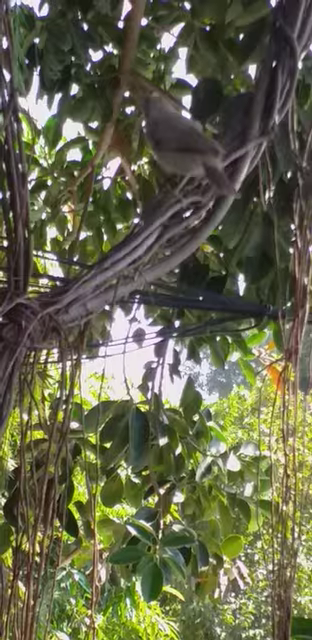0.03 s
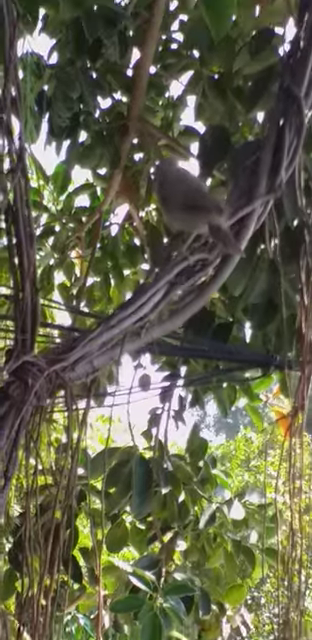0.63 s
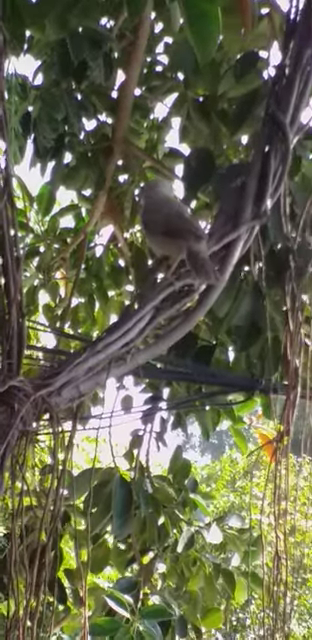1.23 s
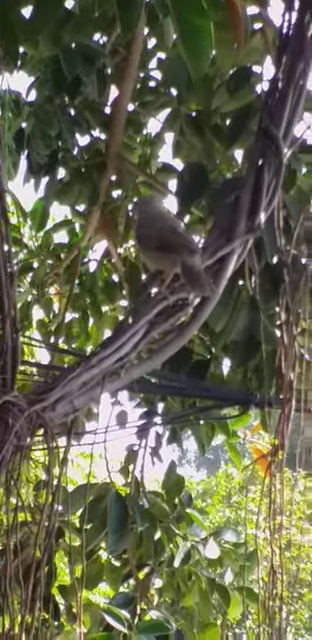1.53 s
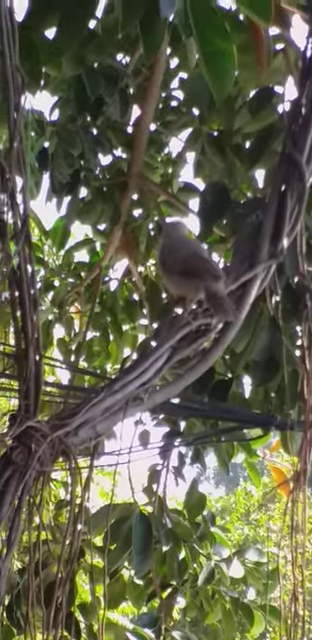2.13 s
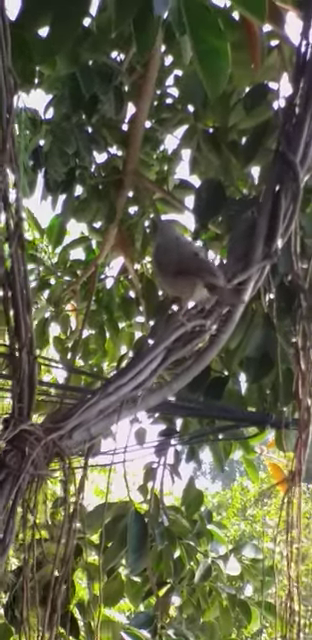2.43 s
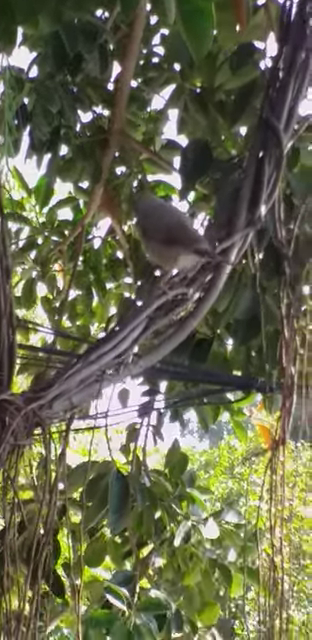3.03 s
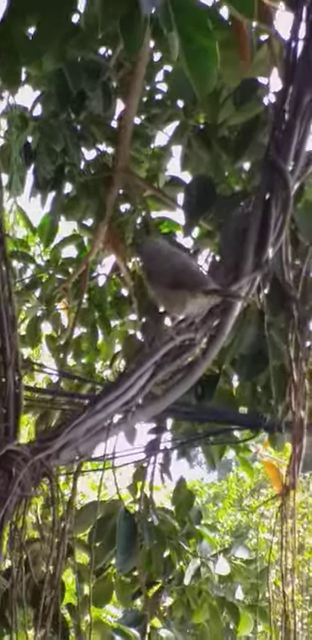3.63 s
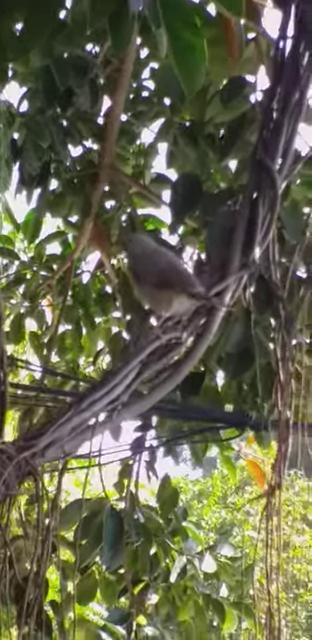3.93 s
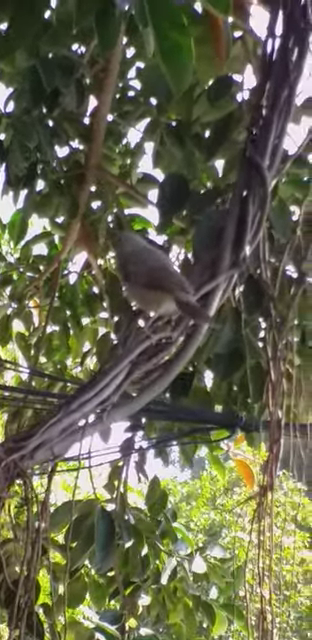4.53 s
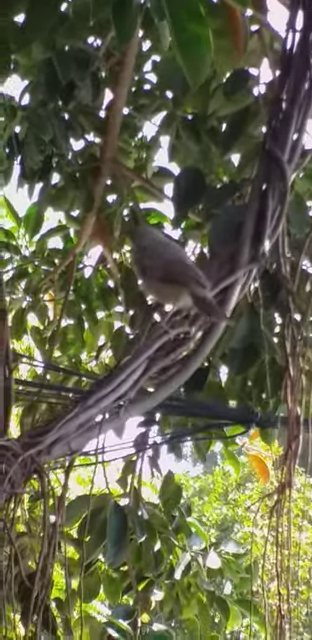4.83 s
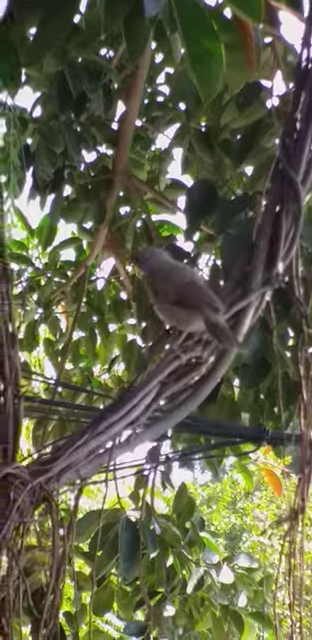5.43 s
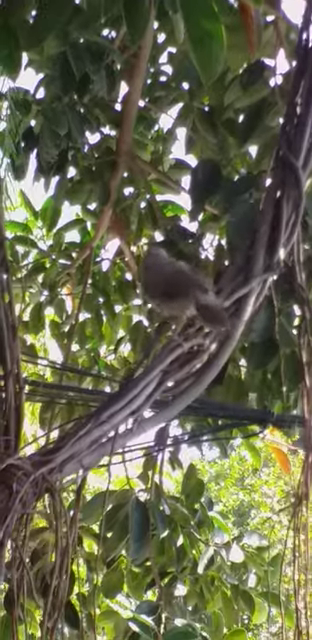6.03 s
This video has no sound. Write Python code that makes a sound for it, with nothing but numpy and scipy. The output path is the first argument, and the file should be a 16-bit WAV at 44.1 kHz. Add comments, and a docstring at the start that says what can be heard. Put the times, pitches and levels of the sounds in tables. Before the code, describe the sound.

Several birds call in a leafy tree, trading short harsh rasps, hoarse wheezy whistles and quick high chips. A closer nasal squawk comes about two seconds in, followed by a busy run of rasps and screeches. From halfway, a vehicle pulls away with a growing low rumble while the birds keep calling. The calls echo lightly through the foliage, over faint distant traffic and leaf noise, heard in mono.

```python
"""A party of babblers calls in a leafy tree: harsh rasps, wheezy whistles, chips and one nasal squawk.
Each call follows the source-filter principle: the syrinx snaps or oscillates, and throat or beak colours
the sound. Trunks and foliage scatter it into echoes and a diffuse tail. Behind the birds lies the noise
of far traffic and leaves, and one vehicle pulls away, growing louder with load and speed.
Both channels carry the same signal."""
import sys
import numpy as np
from scipy import signal
from scipy.fft import rfft, irfft, next_fast_len
from scipy.io import wavfile
from scipy.ndimage import map_coordinates

SR = 44100
rng = np.random.default_rng(int(sys.argv[2]) if len(sys.argv) > 2 else 0)


def wrap_up_sound(samples):
    """Save the sound to the file named by the first command line argument, as 16-bit audio."""
    columns = np.atleast_2d(samples).T
    # keep every value between -1 and 1, then stretch to whole-number steps
    tamed = np.clip(columns, -1, 1)
    steps = np.round(tamed * 32767).astype(np.int16)
    wavfile.write(sys.argv[1], SR, steps)


N = 276507
TOP_HZ = 15700  # band limit


def amp(db):
    """Decibels as an amplitude ratio."""
    return 10 ** (np.asarray(db) / 20)


def unit(x):
    """Normalisation to rms 1."""
    return x / np.sqrt(np.mean(x ** 2) + 1e-20)


def along(points, hz):
    """Interpolation of (frequency_hz, value) points on a logarithmic frequency axis."""
    knots_hz, values = np.transpose(points)
    return np.interp(np.log(hz + 1), np.log(knots_hz + 1), values)


def span(start, end):
    """Sample times from start to end, in seconds."""
    return np.arange(int(start * SR), min(int(end * SR), N)) / SR


def add(track, t, x):
    """Superposition of x on the track at the times t."""
    track[round(t[0] * SR):][:len(x)] += x


def wobble(knots_per_s, size):
    """Random modulation: a smooth curve through Gaussian knots."""
    knots = rng.standard_normal(int(size * knots_per_s / SR) + 4)
    return map_coordinates(knots, [np.arange(size) * knots_per_s / SR])


def coloured(x, points):
    """Linear filtering by a (frequency_hz, gain_db) response."""
    size = next_fast_len(len(x) + 8192)
    return irfft(rfft(x, size) * amp(along(points, np.fft.rfftfreq(size, 1 / SR))), size)[:len(x)]


def noise(points):
    """Spectral shaping of white noise, at rms 1."""
    return unit(coloured(rng.standard_normal(N), points))


# spectrum of far traffic and leaves: frequency_hz, density_db
AMBIENT_SPECTRUM = [(25, -35.5), (42, -14), (56, -3), (100, 2.5), (165, -7.5), (280, -10), (500, -15.5),
                    (650, -9.5), (850, -16.5), (2000, -12), (5000, -23), (9000, -29), (15000, -20)]


def ambience():
    """Incoherent sources, far traffic and leaves, sum to a gently wavering noise."""
    return amp(-49.5 + 1.296 * wobble(4.163, N)) * noise(AMBIENT_SPECTRUM)


ARRIVES_S, PULLS_AWAY_S, EASES_OFF_S = 2.77, 3.556, 5.9604  # fade-in ends; half throttle; fade-out starts
IDLE_HZ, REV_HZ_PER_S, THROTTLE_OPENING_S = 13.8, 12, 0.4953
FADE_IN_DB_PER_S, FADE_OUT_DB_PER_S = 69.5, 29


def drive():
    """Acceleration: the engine's cycle rate integrates the throttle (0-1) until the vehicle eases off."""
    t = np.arange(N) / SR
    throttle = np.clip((t - PULLS_AWAY_S) / THROTTLE_OPENING_S + .5, 0, 1)
    cycle_hz = IDLE_HZ + REV_HZ_PER_S * np.cumsum(throttle * (t < EASES_OFF_S)) / SR
    fade_db = -FADE_IN_DB_PER_S * np.maximum(ARRIVES_S - t, 0)
    fade_db -= FADE_OUT_DB_PER_S * np.maximum(t - EASES_OFF_S, 0)
    return throttle, cycle_hz, fade_db


# tones of the vehicle's whine at top speed: frequency_hz, level_db
WHINE_TONES = [(680, -4), (770, -5.5), (820, 0), (980, -2), (1120, -14.5)]


def whine(climb_per_s=.035, waver=0.00696):
    """Frequency follows speed: a few wavering tones creep up in pitch."""
    speed = 1 - climb_per_s * np.maximum(EASES_OFF_S - np.arange(N) / SR, 0)
    tones = np.zeros(N)
    for hz, db in WHINE_TONES:
        gain = amp(db + 2 * wobble(10, N))
        phase = 2 * np.pi * hz * np.cumsum(speed * (1 + waver * wobble(30, N))) / SR
        tones += gain * np.sin(phase)
    return unit(tones)


# spectra of the vehicle's low rumble and broad roar: frequency_hz, density_db
RUMBLE_SPECTRUM = [(25, -41.5), (42, -35.5), (58, -1.5), (90, -14.5), (120, 8), (175, -11.5), (280, -8.5),
                   (360, -8.5), (450, -31.5), (900, -26.5)]
ROAR_SPECTRUM = [(40, -53.5), (350, -5), (520, -3.5), (680, 2), (810, 3.5), (1000, -1), (1300, -0.5),
                 (1850, 0), (2500, -7), (4000, -11.5), (7000, -19), (15000, -75.5)]


def vehicle_noise(load_db=22.5, db_per_octave=20.5):
    """Rumble grows with engine load; roar and whine grow as a power law of engine speed."""
    throttle, cycle_hz, fade_db = drive()
    rumble_db = -69.5 + load_db * throttle
    roar_db = -66.5 + db_per_octave * np.log2(cycle_hz / IDLE_HZ) + fade_db
    rumble = amp(rumble_db + 3.33 * wobble(9, N)) * noise(RUMBLE_SPECTRUM)
    roar = amp(roar_db + 0.137 * wobble(12, N)) * (noise(ROAR_SPECTRUM) + amp(-8.5) * whine())
    return rumble + roar


# resonances of the exhaust: frequency_hz, gain_db
EXHAUST_RESPONSE = [(38, -38), (55, 1.5), (80, -3.5), (113, 2.5), (140, -5.5), (165, -25), (320, -14.5),
                    (430, -23.5)]


def engine(load_db=6.5, db_per_octave=9, firing_db=2.5):
    """Engine orders, harmonics of the cycle rate, sweep through the exhaust's fixed resonances."""
    throttle, cycle_hz, fade_db = drive()
    level_db = -62 + load_db * throttle + db_per_octave * np.log2(cycle_hz / IDLE_HZ) + fade_db
    phase = 2 * np.pi * np.cumsum(cycle_hz * (1 + 0.00327 * wobble(8, N))) / SR
    orders = np.zeros(N)
    for k in range(2, 14):
        order_db = along(EXHAUST_RESPONSE, k * cycle_hz) + firing_db * (k % 4 == 0)
        orders += amp(order_db + 3.99 * wobble(5, N)) * np.sin(k * phase + rng.uniform(0, 2 * np.pi))
    return amp(level_db) * orders


# reverberation time of the foliage: frequency_hz, t60_s
FOLIAGE_DECAY = [(1500, 0.54), (3000, 0.674), (5500, 0.692), (12000, 0.477)]


def grove(x, leaf_t60_s=0.064, build_up_s=0.0061):
    """Scattering: close leaves blur a call, trunks return echoes, far foliage gives a diffuse tail."""
    hz, t, spectra = signal.stft(rng.standard_normal(SR), SR, nperseg=256)
    decay = amp(-60 * t / along(FOLIAGE_DECAY, hz)[:, None])
    tail = signal.istft(spectra * decay, SR, nperseg=256)[1]
    age = np.arange(len(tail)) / SR
    tail *= 1 - np.exp(-age / build_up_s)
    blur = rng.standard_normal(len(age)) * amp(-60 * age / leaf_t60_s)
    response = amp(-4) * (tail / np.linalg.norm(tail) + blur / np.linalg.norm(blur))
    for delay_s, reflection in rng.uniform([.004, -1], [.07, 1], size=(10, 2)):  # ten trunks
        response[int(delay_s * SR)] += amp(-9.5) * reflection
    return signal.fftconvolve(x, response)[:N]


# harmonics of a whistled note: multiple, level_db
WHISTLE_HARMONICS = [(1, 3), (2, -14.5), (3, -24)]


def note(t, pitch_hz, db, hoarseness, flutter_db, partials=WHISTLE_HARMONICS, edge_s=0.00178):
    """Membrane oscillation: fast, bounded jitter makes it hoarse (hoarseness is a fraction of pitch)."""
    jitter = hoarseness * np.tanh(1.65 * wobble(900, len(t)))
    waver = 0.00491 * wobble(119.91, len(t))
    phase = 2 * np.pi * np.cumsum(pitch_hz * (1 + jitter + waver)) / SR
    tone = sum(amp(level_db) * np.sin(k * phase + rng.uniform(0, 2 * np.pi)) * (k * pitch_hz < TOP_HZ)
               for k, level_db in partials)
    flutter = amp(flutter_db * wobble(257.84, len(t)))
    gate = np.clip(np.minimum(t - t[0], t[-1] - t) / edge_s, 0, 1)
    out = np.zeros(N)
    add(out, t, unit(tone * flutter) * gate * amp(db))
    return out


# plain whistles: start_s, end_s, level_db, start_hz, end_hz, hoarseness
WHISTLE_NOTES = [(0.383, 0.798, -51.5, 7800, 7707, 0.083), (0.409, .82, -62.5, 9940, 10050, 0.083),
                 (1.68, 1.743, -48, 2446, 1978, 0.043), (2.872, 2.941, -38, 4012, 3915, 0.0271),
                 (2.921, 3.023, -46, 2907, 3040, 0.0543), (4.427, 4.618, -43, 4575, 4553, 0.0075),
                 (5.001, 5.19, -29, 3146, 2991, 0.0365), (5.737, 5.823, -52.5, 2470, 2056, 0.0244),
                 (6.202, 6.27, -46.5, 3600, 3608, 0.019)]


def whistle(start, end, db, start_hz, end_hz, hoarseness):
    """A linear frequency glide whose level peaks early and fades."""
    t = span(start, end)
    progress = np.linspace(0, 1, len(t))
    pitch_hz = start_hz + (end_hz - start_hz) * progress
    level_db = db + np.interp(progress, [0, 0.304, 1], [-3, 0, -5])
    return note(t, pitch_hz, level_db, hoarseness, flutter_db=1.5)


# chips: start_s, crest_s, end_s, level_db, swell_db, start_hz, crest_hz, end_hz, hoarseness
CHIP_NOTES = [(0.162, 0.209, .25, -38.5, 8, 3353, 6064, 4410, 0.0527),
              (0.98, 1.041, 1.112, -39.5, 1.5, 3893, 5606, 4760, 0.0605),
              (4.008, 4.061, 4.09, -39, -5, 4630, 5039, 4801, 0.023),
              (4.398, 4.427, 4.468, -33, -9, 4200, 4446, 3274, 0.0795),
              (5.308, 5.347, 5.362, -38, -6.5, 3397, 4544, 4135, 0.067),
              (5.37, 5.396, 5.442, -32, 11, 4149, 4959, 3547, 0.0398)]


def chip(start, crest, end, db, swell_db, start_hz, crest_hz, end_hz, hoarseness):
    """A quick frequency sweep that follows a parabola on each side of its crest."""
    t = span(start, end)
    off_crest = np.interp(t, [start, crest, end], [-1, 0, 1])
    pitch_hz = crest_hz + (np.where(t < crest, start_hz, end_hz) - crest_hz) * off_crest ** 2
    level_db = db + swell_db * np.linspace(-.5, .5, len(t))
    return note(t, pitch_hz, level_db, hoarseness, flutter_db=3.5)


# wheezes: start_s, top_s, end_s, level_db, start_hz, held_hz, held_hoarseness
WHEEZE_NOTES = [(0.059, 0.322, .355, -38.5, 1350, 2480, 0.1004),
                (0.869, 1.019, 1.14, -34, 2450, 2700, .125),
                (1.941, 2.058, 2.13, -34.5, 2283, 2910, 0.0282),
                (3.926, 4.007, 4.13, -35.5, 2230, 2420, 0.0472),
                (4.25, 4.295, 4.335, -42.5, 2500, 2820, 0.0513),
                (5.479, 5.633, 5.745, -31.5, 2094, 3280, 0.072),
                (5.998, 6.113, 6.18, -26, 3250, 3615, 0.0121)]


def wheeze(start, top, end, db, start_hz, held_hz, held_hoarseness, settle_s=0.0352):
    """An exponential glide with jitter: pitch and level climb, then the pitch holds as the note fades."""
    t = span(start, end)
    pitch_hz = start_hz * (held_hz / start_hz) ** np.interp(t, [start, top], [0, 1])
    level_db = db + np.interp(t, [start, top, end], [-15, 0, -8])
    hoarseness = np.interp(t, [top - settle_s, top], [0.0775, held_hoarseness])
    return note(t, pitch_hz, level_db, hoarseness, flutter_db=2.0)


# the squawk's pitch, which holds and then drops: time_s, pitch_hz
SQUAWK_CONTOUR = [(2.246, 2882), (2.276, 3091), (2.303, 3033), (2.331, 2510), (2.355, 1806)]
# harmonics of its buzz: multiple, level_db
BUZZ_HARMONICS = [(3, 0.5), (4, -2.5), (5, 0.5), (7, 2), (8, -1), (9, -8), (12, -7.5), (14, -11.5),
                  (15, -8.5)]


def squawk(break_s=2.281, attack_s=0.0242, release_s=0.0218, throb_hz=43):
    """Subharmonic vibration: under a throbbing whistle the syrinx buzzes once in about six cycles."""
    times, contour_hz = np.transpose(SQUAWK_CONTOUR)
    start, end = times[0], times[-1]
    t = span(start, end)
    pitch_hz = np.interp(t, times, contour_hz)
    throb_db = 3.5 * np.cos(2 * np.pi * throb_hz * (t - break_s))
    tone_db = -31.5 + np.interp(t, [start, break_s, end - release_s, end], [-26.5, -3, -2, -5])
    tone = note(t, pitch_hz, tone_db + throb_db, hoarseness=0.0177, flutter_db=4.5, partials=[(0.979, 0)])
    buzz_db = -37.5 + np.interp(t, [start, start + attack_s, end - release_s, end], [-7.5, 1.5, -1, -19.5])
    hoarseness = np.interp(t, [break_s, end], [.025, .11])  # the buzz roughens as the pitch drops
    return tone + note(t, pitch_hz / 6, buzz_db, hoarseness, flutter_db=2.0, partials=BUZZ_HARMONICS)


def syrinx_snaps(calls, throat, rest_hz, pulse_hz, air, onset_db, ending_db, edge_s=.016):
    """Source and filter: uneven snaps and breath noise excite a throat whose resonances slide."""
    out = np.zeros(N)
    for start, peak, end, db, start_hz, end_hz, beak_db in calls:
        t = span(start - edge_s, end + edge_s)
        size = 2 * len(t)
        cycles = np.cumsum(pulse_hz * np.exp(.4 * wobble(pulse_hz, size))) / SR
        snaps = np.diff(np.floor(cycles), prepend=0) * amp(3.1 * rng.standard_normal(size))
        voice = coloured(unit(snaps) + air * rng.standard_normal(size), throat)
        # a shorter throat raises all resonances together; rest_hz is the main one at rest
        slide = np.cumsum(np.interp(t, [start, end], [start_hz, end_hz]) / rest_hz)
        voice = map_coordinates(voice, [slide], order=5)
        voice = unit(coloured(voice, [(6000, 0.004), (10500, beak_db)]))  # the beak raises or lowers the treble by beak_db
        corners_s = [start - edge_s, start + edge_s, peak, end - edge_s, end + edge_s]
        envelope_db = np.interp(t, corners_s, [-24, onset_db, 0, ending_db, -18])
        add(out, t, voice * amp(db + envelope_db + 1.075 * wobble(109.35, len(t))))
    return out


# harsh calls: start_s, peak_s, end_s, level_db, start_resonance_hz, end_resonance_hz, beak_db
CHURR_CALLS = [(.67, .71, .82, -47, 2176, 2078, -11.5), (1.28, 1.32, 1.42, -48.5, 1875, 1903, -10.5),
               (1.84, 1.95, 2.04, -47, 1993, 2116, 1.5), (3.12, 3.17, 3.27, -47, 2229, 2193, 3),
               (3.37, 3.4, 3.46, -50, 2028, 1971, -9.5), (3.77, 3.82, 3.9, -39.5, 1960, 2046, 9),
               (6.19, 6.23, 6.26, -39, 2206, 2266, 15)]
RASP_CALLS = [(.41, .47, .55, -41.5, 3652, 3434, -14), (2.58, 2.67, 2.73, -35.5, 4191, 4031, 4),
              (2.72, 2.76, 2.79, -45.5, 3290, 3166, 6.5), (2.79, 2.83, 2.89, -43, 4906, 3860, 7),
              (4.335, 4.41, 4.46, -36.5, 4164, 4045, 10.5), (4.64, 4.74, 4.85, -36.5, 3670, 3434, 7.5)]
SCREECH_CALLS = [(2.515, 2.55, 2.6, -35.5, 5109, 4240, 6.3), (3.03, 3.1, 3.3, -31.5, 4642, 4494, 3.9),
                 (5.03, 5.09, 5.17, -37.5, 4759, 4485, 19.3)]
HISS_CALLS = [(2.495, 2.51, 2.53, -40.5, 6290, 5530, -12), (3, 3.02, 3.05, -42, 6280, 5517, -2),
              (5.87, 5.95, 6.01, -37.5, 5537, 5234, 8.5)]
# response of the resting throat for each kind: frequency_hz, gain_db
CHURR_FORMANTS = [(900, -22.5), (1600, -11.5), (2000, 3.5), (2500, -9), (3100, -14.5), (3800, -3),
                  (4500, -15), (5700, -19), (6600, -8.5), (7500, -27.5), (9000, -33), (15000, -28.5)]
RASP_FORMANTS = [(1200, -31), (2100, -16.5), (2700, -22.5), (3400, -4.5), (4000, 1.5), (4600, -10.5),
                 (5200, -24.5), (5900, -23), (6800, -18.5), (8200, -22), (9500, -27), (15000, -32.5)]
SCREECH_FORMANTS = [(1300, -31.5), (2300, -26), (2900, -44.5), (3250, -5.5), (4100, -7), (4550, -0.5),
                    (5000, -7.5), (6200, -12), (6800, -11.5), (7400, -19), (9500, -23), (11000, -19.5),
                    (15000, -31.5)]
HISS_FORMANTS = [(3000, -31), (4300, -14), (4900, -1.5), (5500, -5), (6300, -7.5), (7200, -29),
                 (15000, -44.5)]


def harsh_calls():
    """Formants set the timbre: four throat shapes give churrs, rasps, screeches and hisses."""
    churrs = syrinx_snaps(CHURR_CALLS, CHURR_FORMANTS, rest_hz=2010, pulse_hz=415.1,
                          air=0.96, onset_db=-4, ending_db=-3.5)
    rasps = syrinx_snaps(RASP_CALLS, RASP_FORMANTS, rest_hz=4016.3, pulse_hz=398.83,
                         air=1.0, onset_db=-0.5, ending_db=-1.5)
    screeches = syrinx_snaps(SCREECH_CALLS, SCREECH_FORMANTS, rest_hz=4531, pulse_hz=597.7,
                             air=0.97, onset_db=-4, ending_db=-4)
    hisses = syrinx_snaps(HISS_CALLS, HISS_FORMANTS, rest_hz=5386, pulse_hz=595.4,
                          air=0.37, onset_db=-7, ending_db=-2.5)
    return churrs + rasps + screeches + hisses


# the open beak's colour on voiced notes: frequency_hz, gain_db
BEAK_RESPONSE = [(5200, -2.5), (6500, -7), (9000, -0.5), (11000, 12), (13000, 5)]


def babblers():
    """Radiation from the beak filters the party's voiced notes, which join its harsh calls."""
    harsh = harsh_calls()
    voiced = sum(wheeze(*row) for row in WHEEZE_NOTES)
    voiced += sum(chip(*row) for row in CHIP_NOTES)
    voiced += sum(whistle(*row) for row in WHISTLE_NOTES)
    return harsh + coloured(voiced, BEAK_RESPONSE)


def scene():
    """Direct and scattered sound add over the road noise; the squawking bird is closer, so drier."""
    party, near_bird = babblers(), squawk()
    scattered = grove(party + amp(-4) * near_bird)
    birds = amp(-0.86) * (party + scattered) + near_bird
    mono = birds + vehicle_noise() + ambience() + engine()
    return np.array([mono, mono])


# response of the microphone: frequency_hz, gain_db
MICROPHONE_RESPONSE = [(7500, 0), (8700, -16.5), (11000, -17.5), (15000, -20)]


def record(dry, opens_s=.037):
    """Low-pass filtering: the microphone opens after a moment, dulls the top octave and cuts at TOP_HZ."""
    heard = np.array([coloured(side, MICROPHONE_RESPONSE) for side in dry])
    heard *= np.arange(N) / SR > opens_s
    return irfft(rfft(heard) * (np.fft.rfftfreq(N, 1 / SR) < TOP_HZ), N)


dry = scene()
out = record(dry)
wrap_up_sound(out)
```